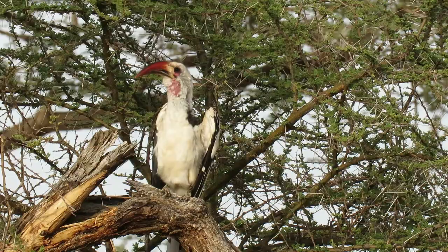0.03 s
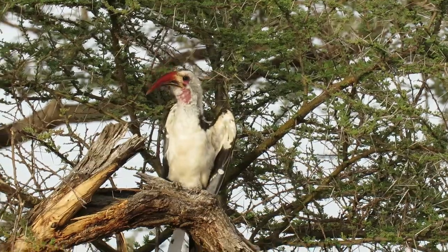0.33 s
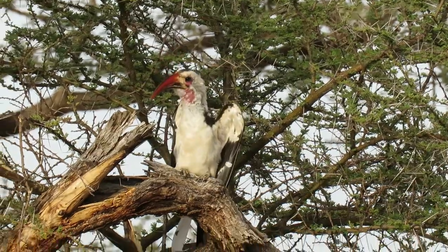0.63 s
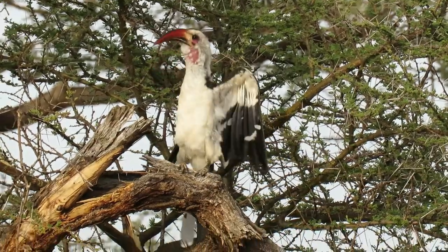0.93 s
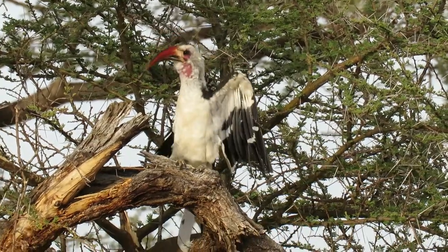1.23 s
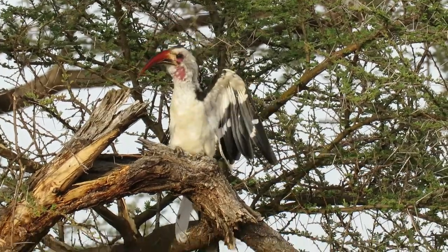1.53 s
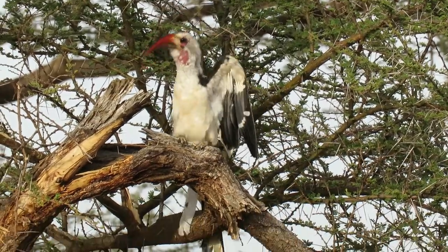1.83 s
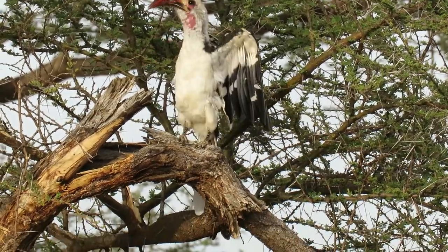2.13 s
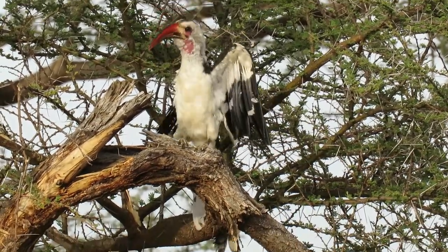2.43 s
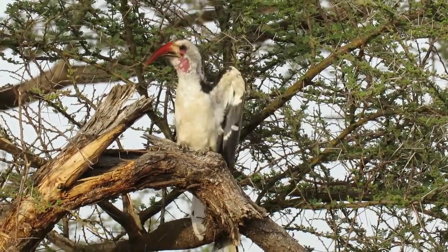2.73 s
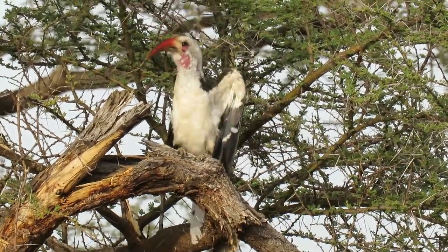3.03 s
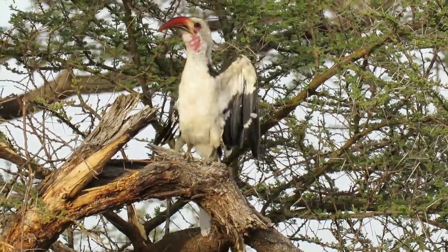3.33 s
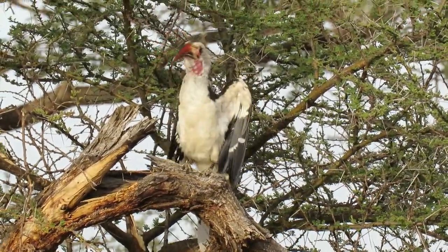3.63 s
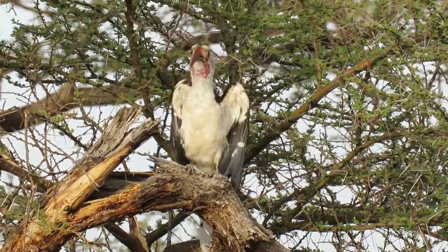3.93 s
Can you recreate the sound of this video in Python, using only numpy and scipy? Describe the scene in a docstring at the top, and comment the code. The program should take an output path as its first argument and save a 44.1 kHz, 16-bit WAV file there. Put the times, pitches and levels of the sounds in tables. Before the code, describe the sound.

A hornbill clucks throughout, alternating a short raspy call with a longer rising one, nearly three pairs a second. Small birds twitter and trill farther off from about 0.8 seconds, giving way to faint falling whistles from around 2.8 seconds. Low wind gusts buffet the microphone from 1 second, strongest around 1.5 to 2 seconds and again from 3. A soft outdoor hiss and very faint steady tone lie underneath.

```python
"""A hornbill clucks in pairs: a short upward "kok", then a longer, slowly rising "wok".
Each call is a harmonic tone sweeping through fixed throat and bill resonances; trunks and
branches throw it back. Small birds twitter, trill and whistle farther off. Gusts buffet
the microphone over the faint hiss of open savanna and a faint steady tone."""
import sys
import numpy as np
from scipy import signal
from scipy.fft import rfft, irfft
from scipy.io import wavfile
from scipy.ndimage import uniform_filter1d

SR = 44100
rng = np.random.default_rng(int(sys.argv[2]) if len(sys.argv) > 2 else 0)


def dump(signal):
    """Clip the signal to [-1, 1] and save it as 16-bit WAV at the path in sys.argv[1]."""
    limited = np.clip(np.atleast_2d(signal).T, -1, 1)
    pcm = np.round(limited * 32767).astype(np.int16)
    wavfile.write(sys.argv[1], SR, pcm)


N = 176400

RASP_DB, KOK_BREAK_S = -36, 0.024  # hornbill: base rasp; time at which the short call breaks up
FLICKER_DB, FLICKER_HZ = 3.5, 219  # small birds


def amp(db):
    """Decibels to gain."""
    return 10 ** (np.asarray(db) / 20)


def unit(x):
    """Scale to rms 1."""
    return x / np.sqrt(np.mean(x ** 2) + 1e-20)


def read(points, hz):
    """Interpolate a table on a log-frequency axis."""
    f, value = np.transpose(points)
    return np.interp(np.log(hz + 1), np.log(f + 1), value)


def add(mix, start_s, sound):
    """Mix a sound in, in place."""
    part = mix[max(round(start_s * SR), 0):][:len(sound)]
    part += sound[:len(part)]


def wander(count, hz):
    """Smooth noise, rms about 1, low-passed at hz."""
    size = 16384
    f = np.fft.rfftfreq(size, 1 / SR)
    return unit(irfft(rfft(rng.standard_normal(size)) / (1 + (f / hz) ** 4)))[:count]


def noise_pair(gain, correlation, size):
    """Stereo noise from a frames x bins gain and a left-right correlation per bin."""
    a, b, c, d = rng.standard_normal((4,) + gain.shape)
    left = a + 1j * b
    right = correlation * left + np.sqrt(1 - correlation ** 2) * (c + 1j * d)
    spectra = (gain * np.array([left, right])).transpose(0, 2, 1)
    return signal.istft(spectra, nperseg=size, noverlap=size * 3 // 4)[1][:, :N]


def echoes(x, boost_db=0):
    """Direct sound plus distinct returns off trunk and branches."""
    # reflections (delay [s], gain [dB])
    returns = [(.0075, -21), (.0165, -19), (.035, -26)]
    out = x.copy()
    for delay_s, db in returns:
        add(out, delay_s + 0.00051 * rng.standard_normal(), amp(boost_db + db) * x)
    return out


def trees(x, wet_db):
    """Direct sound plus diffuse foliage scatter, different on each side."""
    # scatter decay (frequency [Hz], T60 [s])
    t60_s = [(300, 0.26), (800, 0.08), (2000, 0.3), (5000, 0.21), (12000, 0.22)]
    hz, t, noise = signal.stft(rng.standard_normal((2, SR // 2)), SR, nperseg=256)
    envelope = np.minimum(t / 0.011, 1) * amp(-60 * t / read(t60_s, hz)[:, None])
    tail = signal.istft(noise * envelope, SR, nperseg=256)[1]
    tail /= np.linalg.norm(tail[0])
    return x + amp(wet_db) * signal.fftconvolve(x[None], tail, axes=1)[:, :N]


def air(rms_db=-51.7, patch_db=3):
    """Distant wind in the trees and faint hiss, with drifting spectral patches."""
    # air spectrum (frequency [Hz], relative density [dB])
    spectrum = [(20, -14), (50, 0.03), (110, 0.03), (250, -6), (520, -10), (750, -6), (1100, -8),
                (1800, -16), (4000, -21), (8000, -32), (11500, -37), (14000, -50)]
    # stereo image (frequency [Hz], left-right correlation [-1..1])
    correlation = [(40, 0.87), (120, -0.4), (300, .25), (700, -0.2)]
    hz = np.fft.rfftfreq(2048, 1 / SR)
    drift = uniform_filter1d(rng.standard_normal((N // 512 + 5, len(hz))), size=8, axis=0)
    patches = unit(uniform_filter1d(drift, size=20, axis=1))
    gain = amp(read(spectrum, hz) + patch_db * patches)
    return amp(rms_db) * unit(noise_pair(gain, read(correlation, hz), size=2048))


def whine(hz=1029.6, peak_db=-65):
    """A faint steady tone."""
    return amp(peak_db) * np.sin(2 * np.pi * hz * np.arange(N) / SR)


def throat(x, size=2048):
    """Throat and bill: a minimum-phase filter whose resonances ring briefly."""
    # throat and bill response (frequency [Hz], gain [dB])
    response = [(300, -22.5), (600, -6.5), (700, -1.5), (780, -0.5), (900, -2), (1200, -4), (1315, -.2),
                (1400, -13), (1520, -17), (1600, -11), (1850, -25), (2100, -27.5), (2280, -16.5),
                (2500, -29), (2780, -34), (3300, -44), (4400, -46), (8600, -63), (10500, -61), (13000, -88)]
    log_gain = np.log(amp(read(response, abs(np.fft.fftfreq(size, 1 / SR)))))
    impulse = np.fft.ifft(np.exp(signal.hilbert(log_gain).conj())).real
    return signal.fftconvolve(x, impulse[:size // 2])


def cluck(shape, level_db, onset_db, end_rasp_db):
    """A rising, raspy harmonic tone through the throat; length varies slightly per call."""
    jitter, shimmer_db, build_s, high_rasp = 0.004, 1.8, 0.03, 0.7
    knots_s, ratio, effort_db = np.transpose(shape)
    knots_s = knots_s * (1 + 0.01 * rng.standard_normal())
    t = np.arange(0, knots_s[-1], 1 / SR)
    hz = 701.2 * uniform_filter1d(np.interp(t, knots_s, ratio), size=150)
    hz *= 1 + jitter * wander(len(t), hz=250)
    phase = 2 * np.pi * np.cumsum(hz) / SR
    rasp = amp(np.interp(t, [KOK_BREAK_S / 2, KOK_BREAK_S], [RASP_DB, end_rasp_db]))
    build_db = onset_db * np.maximum(1 - t / build_s, 0)  # upper harmonics start at onset_db
    tone = np.zeros(len(t))
    for k in range(1, 17):
        grain = 1 + (rasp * k if k < 5 else high_rasp) * wander(len(t), hz=486)
        upper_db = build_db + shimmer_db * wander(len(t), hz=50)
        tone += amp(upper_db * (k > 2)) * grain * np.sin(k * phase)
    return throat(tone * np.sqrt(2) * amp(level_db + np.interp(t, knots_s, effort_db)))


def snaps(level_db, t60_s=0.037, gap_s=0.0045, step_db=-3.5):
    """The voice breaks into six uneven, fading pulses that ring in throat and bill."""
    # ringing modes (frequency [Hz], level re call [dB])
    modes = [(870, -14), (1130, -19), (1560, -15), (2500, -27)]
    t = np.arange(SR // 10) / SR
    ring = sum(amp(db - 60 * t / t60_s) * np.sin(2 * np.pi * hz * t) for hz, db in modes)
    out = np.zeros(len(t))
    for k, start_s in enumerate(np.cumsum(gap_s * (.5 + rng.random(size=6)))):
        add(out, start_s, amp(level_db + k * step_db) * ring)
    return out


def hornbill():
    """Long and short calls in turn; the short one breaks up as its pitch shoots up."""
    # long and short calls (start [s], source level [dB])
    woks = [(.04, -30.5), (0.41, -28), (.773, -27.5), (1.1389, -28), (1.494, -26), (1.857, -26.5),
            (2.221, -28), (2.586, -27.5), (2.9429, -27), (3.306, -26.5), (3.6656, -27)]
    koks = [(.229, -29.5), (.592, -29), (.959, -30), (1.3157, -28.5), (1.6778, -28), (2.043, -29.5),
            (2.4074, -29.5), (2.769, -29), (3.1312, -29), (3.489, -29), (3.8482, -28.5)]
    # call contours (time [s], pitch [ratio], effort [dB])
    wok_shape = [(0, 1.0, -18), (.004, .935, -9), (.009, .9, -5), (.022, .947, -1.2), (.04, .99, -.4),
                 (.065, 1.015, -1.5), (.077, 1.078, -2.5), (.091, 1.04, -9.5), (.104, 1.07, -20.5),
                 (.118, 0.9, -43)]
    kok_shape = [(0, .98, -15), (.003, .95, -5), (.009, .935, -.5), (.013, .965, .5), (.018, 1.07, 1.5),
                 (.022, 1.19, -4), (.027, 1.29, -11), (.036, 1.31, -23)]
    out = np.zeros(N)
    for start_s, db in woks:
        add(out, start_s, echoes(cluck(wok_shape, db, onset_db=-11, end_rasp_db=RASP_DB)))
    for start_s, db in koks:
        call = cluck(kok_shape, db, onset_db=0, end_rasp_db=-10.5)
        add(call, KOK_BREAK_S, snaps(db))
        add(out, start_s, echoes(call))
    return out


def songbird(notes, voices, swell_power, flicker_hz, waver=0.0088):
    """Wavering notes bend through three pitches, swell and fade; branches echo them."""
    out = np.zeros(N)
    for start_s, length_s, first_hz, middle_hz, last_hz, db in notes:
        u = np.linspace(0, 1, int(length_s * SR))
        hz = np.polyval(np.polyfit([0, .5, 1], [first_hz, middle_hz, last_hz], 2), u)
        hz *= 1 + waver * wander(len(u), flicker_hz)
        phase = 2 * np.pi * np.cumsum(hz) / SR
        swell = abs(np.sin(np.pi * u)) ** swell_power
        for ratio, voice_db in [(1, 0)] + voices:
            gain = amp(db + voice_db + FLICKER_DB * wander(len(u), flicker_hz))
            add(out, start_s, gain * swell * np.sin(ratio * phase))
    return echoes(out, boost_db=5)


def twitter():
    """A small bird's brief, swooping notes."""
    # notes (start [s], length [s], first [Hz], middle [Hz], last [Hz], level [dB])
    notes = [(.816, 0.022, 7900, 6550, 7400, -62), (.837, 0.026, 7440, 5300, 3900, -54),
             (.945, .024, 6020, 4810, 6700, -51.5), (.969, 0.027, 6500, 5160, 4320, -47.5),
             (1.087, 0.019, 5250, 3750, 3240, -53.5), (1.126, 0.061, 7088, 5440, 3300, -53.5),
             (1.219, 0.027, 8240, 5380, 7640, -50.5), (1.248, 0.027, 6523, 4180, 3480, -51),
             (1.335, .07, 7650, 7300, 6570, -66.5), (1.399, 0.028, 6550, 5290, 6020, -51),
             (1.427, 0.032, 6180, 4690, 3400, -54.5), (1.534, 0.02, 5400, 4500, 3280, -54.5),
             (1.639, 0.021, 5814, 4970, 5800, -54.5), (1.667, 0.03, 5780, 5060, 4180, -53.5),
             (1.767, 0.019, 5130, 3920, 3300, -58.5), (1.895, .04, 6500, 5440, 4120, -62),
             (1.957, 0.014, 6060, 4300, 5540, -58.5), (1.982, 0.022, 4940, 3901, 3280, -57.5),
             (2.096, 0.019, 6130, 5060, 3700, -58.5), (2.28, 0.02, 6330, 5670, 4900, -61),
             (2.328, 0.02, 4878, 4230, 3430, -59), (2.745, 0.036, 4810, 5350, 5300, -55.5)]
    # weaker side voices (pitch [ratio], level re note [dB])
    voices = [(.76, -13.5), (2, -27)]
    return songbird(notes, voices, swell_power=0.84, flicker_hz=FLICKER_HZ)


def trills(strokes_per_s=170, unevenness=0.32, sweep=0.44):
    """Buzzy runs of tiny downward pitch strokes."""
    # runs (start [s], length [s], first [Hz], last [Hz], level [dB])
    runs = [(0.991, 0.068, 4230, 3640, -56), (1.445, 0.1, 3050, 2050, -48.5),
            (2.691, 0.1, 5400, 4900, -58.5), (3.482, 0.038, 4780, 4400, -60.5),
            (3.76, 0.17, 6018, 5350, -63.5)]
    out = np.zeros(N)
    for start_s, length_s, first_hz, last_hz, db in runs:
        u = np.linspace(0, 1, int(length_s * SR))
        stroke = np.cumsum(strokes_per_s * (1 + unevenness * wander(len(u), hz=60))) / SR % 1
        hz = (first_hz + (last_hz - first_hz) * u) * (1 + sweep * (.5 - stroke))
        gain = amp(db + FLICKER_DB * wander(len(u), FLICKER_HZ))
        envelope = abs(np.sin(np.pi * u)) ** .5 * np.sin(np.pi * stroke) ** 2
        add(out, start_s, gain * envelope * np.sin(2 * np.pi * np.cumsum(hz) / SR))
    return out


def wind(breeze_db=-65.5, wake_db=-9.5, wake_s=0.031, low_cut_hz=42):
    """Eddies push the two microphone ports in opposite directions; hard gusts sound higher."""
    # gusts (centre [s], length [s], level [dB])
    gusts = [(1.011,0.024,-40.5), (1.126,0.023,-34.5), (1.164,0.021,-36), (1.368,0.028,-33),
             (1.455,0.013,-31), (1.544,0.024,-25), (1.573,0.037,-29), (1.629,0.053,-26.5), (1.68,0.013,-28),
             (1.739,0.034,-24), (1.786,0.036,-27.5), (1.985,0.034,-27), (2.571,0.038,-34),
             (2.717,0.027,-32.5), (2.988,0.015,-22.5), (3.268,0.024,-27.5), (3.329,0.053,-28.5),
             (3.765,0.019,-26), (3.912,0.022,-32.5), (3.982,0.012,-27.5)]
    # mid-strength gust spectrum (frequency [Hz], relative level [dB])
    spectrum = [(20, -9.5), (45, -13), (70, 5.5), (110, 7.5), (170, -3.5), (250, -10), (400, -31),
                (800, -51.5), (2000, -73)]
    # later gusts sound deeper (time [s], shift [octaves])
    shift = [(1.7, 0.35), (2.5, -0.051)]
    # stereo image (frequency [Hz], left-right correlation [-1..1])
    correlation = [(30, 0.7), (70, -0.17), (130, -0.68), (300, -0.86)]
    mid_gust_db, octaves_per_db = -32.5, 0.05
    t = np.arange(N + 2048) / SR
    power = amp(breeze_db) ** 2
    for centre_s, length_s, db in gusts:
        core = .5 ** np.minimum(2 * (2 * (t - centre_s) / length_s) ** 2, 20)
        wake = amp(wake_db) ** 2 * np.exp(-abs(t - centre_s) / wake_s)  # turbulence around the gust
        power = power + amp(db) ** 2 * (core + wake)
    level_db = 10 * np.log10(power)
    octaves = np.interp(t, *np.transpose(shift))
    octaves += octaves_per_db * np.maximum(level_db - mid_gust_db, -10)
    hz = np.fft.rfftfreq(1024, 1 / SR)
    gain = amp(read(spectrum, hz / 2 ** octaves[::256, None]))
    gain /= np.linalg.norm(gain, axis=1, keepdims=True)
    eddies = noise_pair(gain, read(correlation, hz), size=1024)
    local_rms = np.sqrt(uniform_filter1d(uniform_filter1d((eddies ** 2).mean(0), size=1100), size=700))
    low_cut = signal.butter(2, low_cut_hz, "high", fs=SR, output="sos")
    return signal.sosfilt(low_cut, eddies / local_rms * amp(level_db[:N]))


def whistles():
    """Falling whistles of distant birds."""
    # notes (start [s], length [s], first [Hz], middle [Hz], last [Hz], level [dB])
    notes = [(2.765, 0.135, 3650, 3120, 2760, -54.5), (2.875, 0.042, 5650, 5550, 5470, -63),
             (3.015, 0.1, 4420, 4130, 3850, -55.5), (3.065, 0.18, 4160, 3300, 2750, -54),
             (3.215, 0.17, 5040, 4250, 3950, -55.5), (3.25, .11, 2450, 2090, 2020, -57),
             (3.36, 0.1, 4500, 4150, 4000, -57.5), (3.83, 0.074, 4350, 4150, 4100, -60.5)]
    # weaker side voices (pitch [ratio], level re note [dB])
    voices = [(1.539, -18), (2, -22)]
    return songbird(notes, voices, swell_power=1.3, flicker_hz=110)


def scene():
    """Hornbill in front, small birds deeper in the trees, wind, air and a faint tone."""
    chatter, whistling = twitter() + trills(), whistles()
    birds = trees(hornbill(), wet_db=-18) + trees(chatter, wet_db=-8.5) + trees(whistling, wet_db=-8)
    return birds + wind() + air() + whine()


def record(dry, fade_start_s=0.12, fade_end_s=0.16, cutoff_hz=13800):
    """Quick fade-in from silence, then a steep low-pass."""
    faded = dry * np.interp(np.arange(N) / SR, [fade_start_s, fade_end_s], [0, 1])
    return signal.sosfilt(signal.ellip(8, .2, 70, cutoff_hz, fs=SR, output="sos"), faded)


dry = scene()
out = record(dry)
dump(out)
```